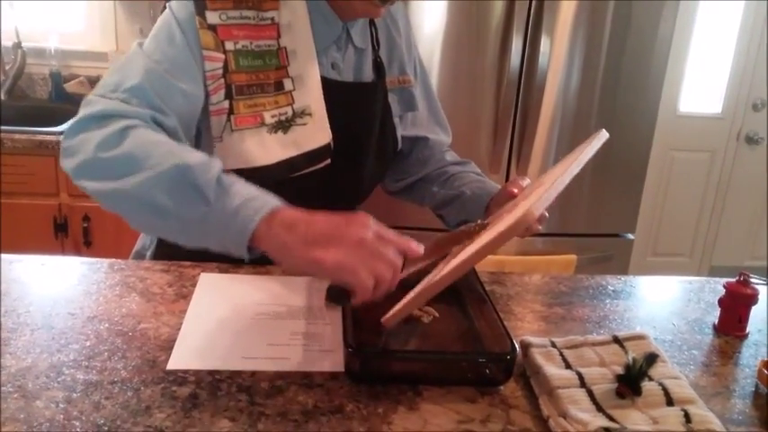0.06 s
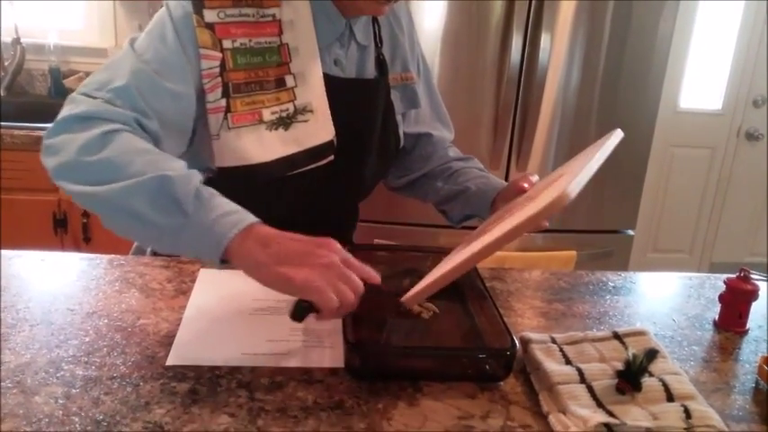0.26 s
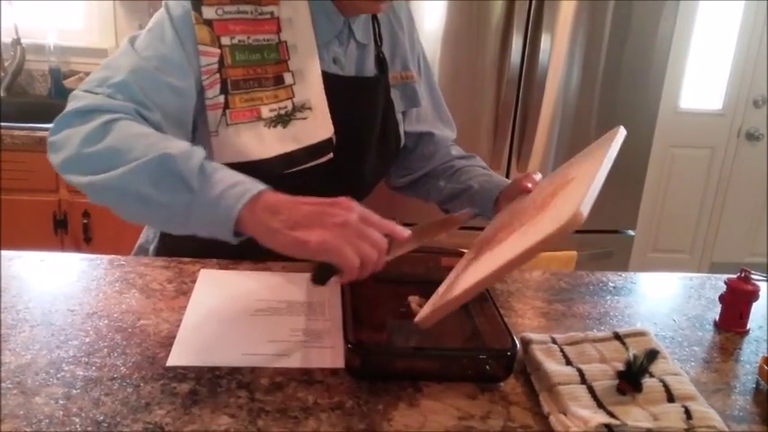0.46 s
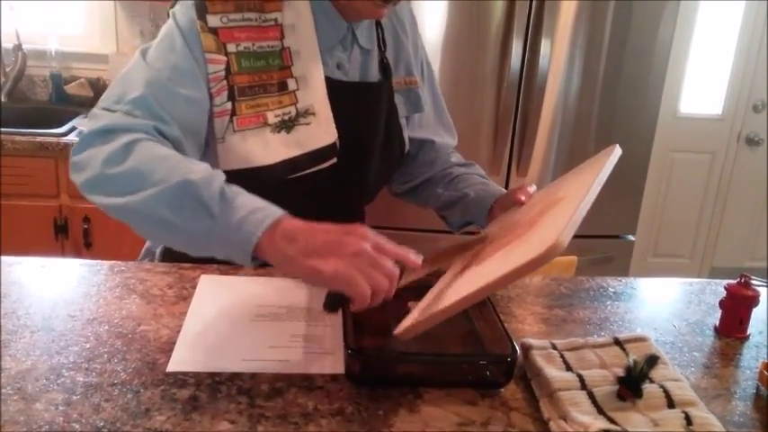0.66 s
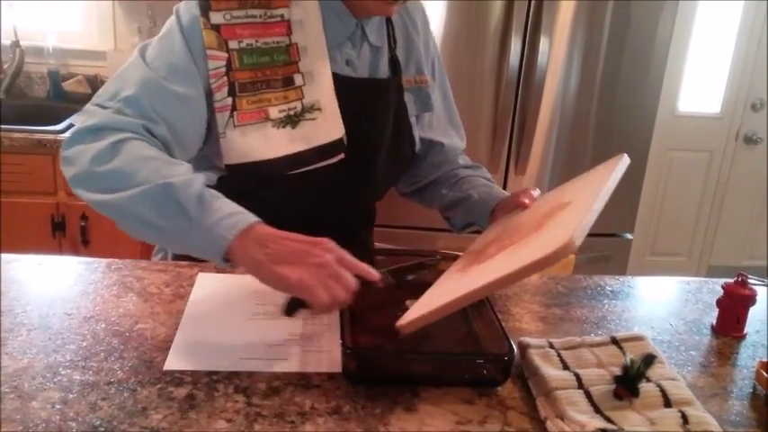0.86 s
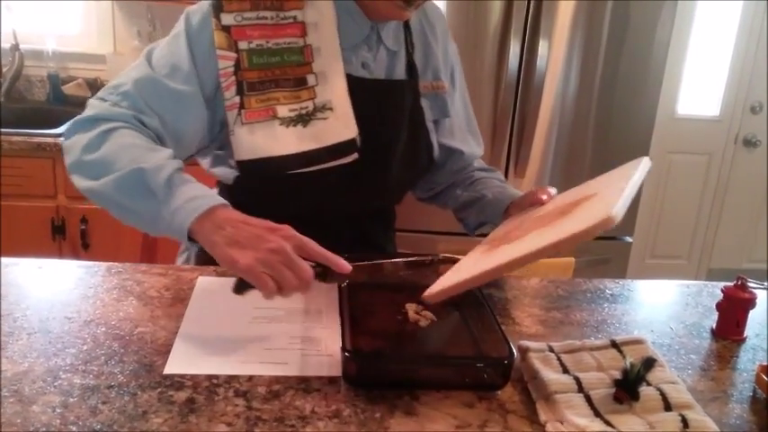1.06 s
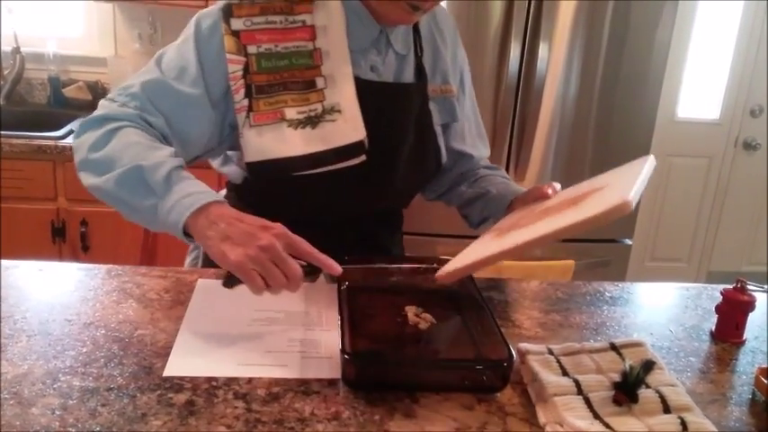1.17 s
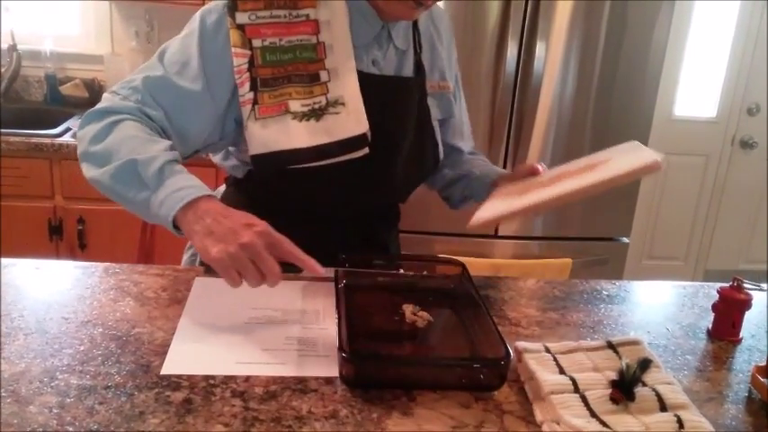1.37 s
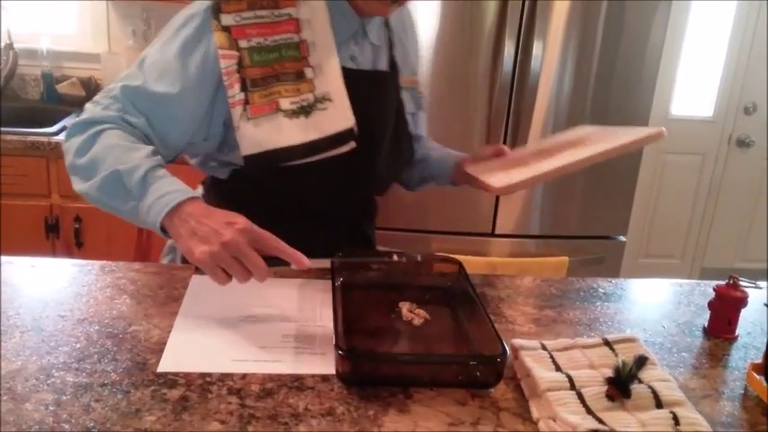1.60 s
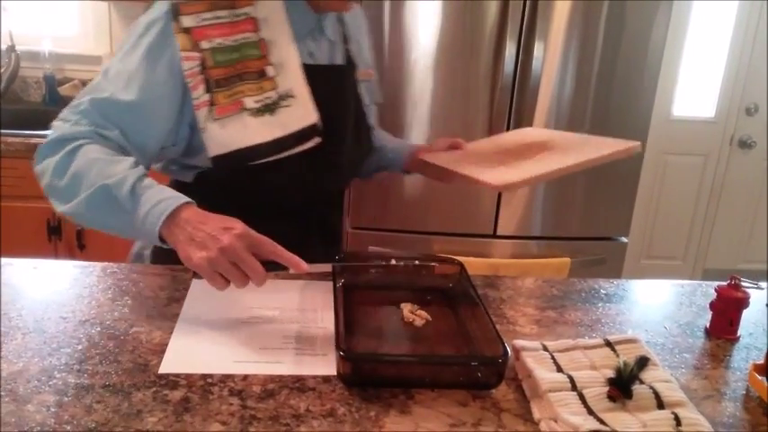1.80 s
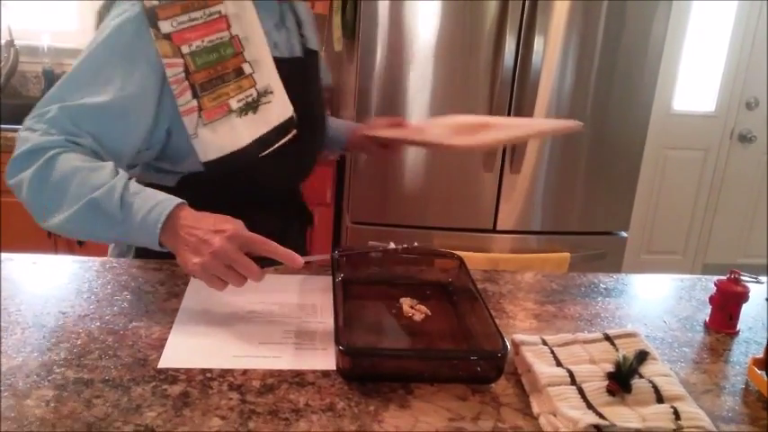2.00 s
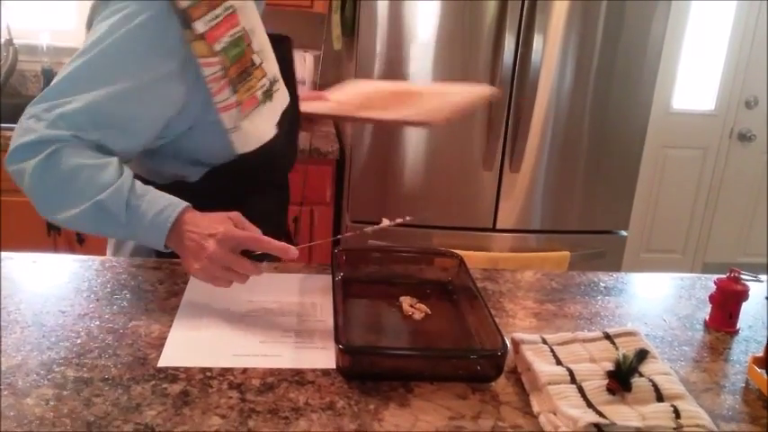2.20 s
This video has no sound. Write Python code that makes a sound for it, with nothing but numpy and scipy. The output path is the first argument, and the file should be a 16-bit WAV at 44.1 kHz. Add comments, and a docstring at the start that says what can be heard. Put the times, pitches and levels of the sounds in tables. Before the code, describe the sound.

A knife scrapes a wooden cutting board in a quiet kitchen. A sharp woody tap at 0.13 s leads to a strong, gritty scrape at 0.2-0.3 s with thin steely hiss. Another tap at 0.8 s runs straight into a shorter, softer scrape until 0.9 s. Reflections fade over soft appliance hum and faint stereo air; from about 2.1 s a sleeve swishes lightly. Close microphones.

```python
"""Knife scraping a wooden board

A kitchen knife is set on a tilted board and scraped down it twice, pushing food into a dish.
Irregular catches and a noisy rub drive resonances of board and blade; sharp taps set the knife down.
Filtered noise bursts make the kitchen's reflections; wavering tones make an appliance's soft hum.
Coloured stereo noise makes the quiet air and, at the end, a sleeve's swish as the board is swung away."""
import sys
import numpy as np
from scipy import signal
from scipy.fft import rfft, irfft
from scipy.io import wavfile

SR = 44100
rng = np.random.default_rng(int(sys.argv[2]) if len(sys.argv) > 2 else 0)


def put_to_file(sound):
    """Save the sound as 16-bit audio at rate SR, in the file named by the first command-line argument."""
    columns = np.atleast_2d(sound).T  # one column per channel
    safe = np.clip(columns, -1, 1)
    whole_steps = np.round(safe * 32767)
    wavfile.write(sys.argv[1], SR, whole_steps.astype(np.int16))


N = 99225
TIME = np.arange(N) / SR

# quiet kitchen's colour before overall scaling: (frequency [Hz], relative density [dB per Hz])
AIR_COLOUR = [(20, -11), (40, -27), (62, -8), (85, -5), (120, -10.5), (160, -12.5), (200, -7.5), (300, -15),
              (345, -18), (400, -13.5), (550, -16.5), (1000, -15), (1750, -18), (3200, -22.5), (4600, -22),
              (6000, -28), (10000, -29), (15500, -28)]
AIR_DB = -66
# left-right likeness of air and sleeve: (frequency [Hz], likeness [-1 to 1])
AIR_LIKENESS = [(30, 0.84), (120, 0.71), (400, 0.55), (1000, 0.16), (3000, 0.042), (15000, 0.017)]
# appliance tones: (frequency [Hz], level [dB])
HUM_TONES = [(118.6, -74), (302, -79.5)]
HUM_WAVER_DEPTH, HUM_WAVER_HZ = 0.25, 12  # depth is relative to the steady tone; rate is a spread

# blade set down on the board: (time [s], contact level [dB], room send against the tap [dB])
TAPS = [(0.135, -27.5, -2), (.808, -27.5, 2.5)]
CHATTER_DB, CHATTER_S = -15, .005  # chatter against the sharp contact, and its decay
# broad response of board and knife under a tap: (frequency [Hz], relative level [dB])
TAP_BODY = [(100, -14), (330, -13.5), (480, -13), (750, -4), (1130, -3.5), (1600, 0.5), (2400, 4),
            (3400, -4), (4700, -1), (5600, -1.5), (7000, -19), (9000, -15.5), (16000, -28)]
# resonances of board and knife together, lifted over the broad response:
# (frequency [Hz], width [Hz], first stroke lift [dB], second stroke lift [dB], tap lift [dB])
BOARD_MODES = [(388, 30, 14, 13, 22), (480, 26, -10, 13, 14), (575, 36, 9, 20, 19), (700, 45, 20, 21, 17),
               (884, 28, 28, 26, 9), (995, 36, 9, 19, 6), (1279, 26, 23, 5, 7), (1392, 42, 10, 18, 9),
               (1845, 50, 9, 6, 7), (1990, 63, 8, -6, -10), (2120, 55, 7, 13, 2), (2255, 72, -4, 11, 5),
               (2545, 27, 14, -4, 4), (2770, 79, 9, 9, -3), (2965, 78, 6, 9, 8), (3200, 70, 12, 5, -1),
               (3690, 57, 6, -4, 0), (3980, 260, 5, 4, 15), (4460, 85, 2, 9, 6), (4800, 112, 4, -10, 1)]

# two strokes, each a list of (time [s], force on the board [dB], hiss of the edge [dB])
STROKES = [
    [(.2, -58.5, -88.5), (.213, -57, -65), (.224, -41, -62), (.249, -33, -46.5), (.28, -34, -49),
     (.297, -31, -50.5), (.302, -30, -67), (.308, -34, -87)],
    [(.809, -57, -63), (.82, -45.5, -64), (.846, -45.5, -60), (.878, -39, -55), (.887, -40.5, -55.5),
     (.904, -34.5, -61), (.911, -81, -81)],
]
SLIPS_PER_S, SLIP_SPREAD_DB, RUB_SHARE = 1400, 4, .55  # rub is a share of the catches' rms
# broad response of board and knife under a scrape: (frequency [Hz], relative level [dB])
SCRAPE_BODY = [(100, -35), (330, -20), (480, -19), (750, -25.5), (1130, -10), (1600, -1), (2400, -2.5),
               (3400, -0.5), (4700, -0.5), (5600, -7), (7000, -12), (10000, -18.5), (16000, -38)]

# thin hiss of the steel edge: (frequency [Hz], relative level [dB])
EDGE_BODY = [(100, -58), (3000, -34), (6000, 15), (8000, -9), (9700, -0.5), (12500, 3.5), (16000, -2.5)]
# rings of the blade: (frequency [Hz], width [Hz], lift [dB])
BLADE_MODES = [(7210, 50, 7), (8980, 60, 10), (10300, 50, 6), (11900, 200, 6), (13650, 150, 4)]
EDGE_LIKENESS, EDGE_LEAN_DB = 0.22, 3.5  # left-right likeness; left minus right

# kitchen reverberation: (frequency [Hz], 60 dB decay time [s], level against the direct sound [dB])
ROOM = [(200, 0.36, -6), (720, 0.5, -1), (1460, .38, -2), (2600, .42, -2.5), (4670, 0.31, 1),
        (6900, 0.47, -7), (11500, 0.7, -10.5)]
ROOM_GAP_S, EARLY_DB, EARLY_S = 0.0072, -5.5, 0.0079
# two close microphones hear low reflections more alike: (frequency [Hz], likeness [-1 to 1])
ROOM_LIKENESS = [(100, 0.46), (500, 0.69), (1000, 0.22), (2000, 0.14), (4000, 0), (15000, 0.34)]
# the room hears the whole board, so its peaks are blunter
ROOM_WIDTH_FACTOR, ROOM_PEAK_DB = 1.4, -3
# stereo lean of the knife sounds: (frequency [Hz], left minus right [dB])
KNIFE_LEAN = [(300, 1), (850, 1.5), (1300, -1.7), (2500, -2.7), (4000, -1), (6000, 0), (9000, 1.5),
              (14000, 2.5)]
LEFT_LEADS_S = .00003

# sleeve's swell: (time [s], level [dB])
SLEEVE_LEVEL = [(1.95, -80), (2.09, -71), (2.18, -58.5), (2.25, -59.5)]
# sleeve's colour: (frequency [Hz], relative level [dB])
SLEEVE_BODY = [(100, -6), (300, -12), (1400, -6.5), (2200, -9.5), (3300, -2.5), (4300, 4.5), (4900, -0.5),
               (5900, -10.5), (9000, -20), (16000, -23)]
CUTOFF_HZ = 15850


def amp(db):
    """Turns decibels into gain."""
    return 10 ** (np.asarray(db) / 20)


def unit(x):
    """Scales a sound to rms 1."""
    return x / np.sqrt(np.mean(x ** 2) + 1e-20)


def read(points, hz, column=1):
    """Reads a table column along log frequency."""
    rows = np.array(points, float)
    return np.interp(np.log(hz + 1), np.log(rows[:, 0] + 1), rows[:, column])


def level(points, column=1):
    """Turns a dB curve into gain over time, silent outside the curve."""
    rows = np.array(points, float)
    db = np.interp(TIME, rows[:, 0], rows[:, column], left=-np.inf, right=-np.inf)
    return amp(db)


def noise():
    """Draws white noise for the whole scene."""
    return rng.standard_normal(N)


def ring(body, modes, size=16384):
    """Minimum-phase impulse response of energy 1: a broad response lifted at each mode."""
    hz = np.fft.rfftfreq(size, 1 / SR)
    lift = 1 + sum(amp(db) ** 2 / (1 + ((hz - f) / width) ** 2) ** 2 for f, width, db in modes)
    magnitude = amp(read(body, hz)) * np.sqrt(lift)
    # folding the cepstrum forward makes the response causal
    cepstrum = irfft(np.log(magnitude))
    cepstrum[1:size // 2] *= 2
    cepstrum[size // 2 + 1:] = 0
    response = irfft(np.exp(rfft(cepstrum)))[:size // 2]
    return response / np.linalg.norm(response)


def through(x, response):
    """Passes a sound through an impulse response."""
    return signal.fftconvolve(x, response)[:N]


def diffuse(body, likeness):
    """Stereo noise of rms 1 with a given colour and left-right likeness."""
    hz = np.fft.rfftfreq(N, 1 / SR)
    left, other = rfft(noise()), rfft(noise())
    same = np.clip(read(likeness, hz), -1, 1)
    right = same * left + np.sqrt(1 - same ** 2) * other
    return unit(irfft(np.array([left, right]) * amp(read(body, hz)), N))


def air():
    """The quiet kitchen's steady stereo noise floor."""
    return amp(AIR_DB) * diffuse(AIR_COLOUR, AIR_LIKENESS)


def hum():
    """Low appliance tones whose strength and phase waver as random slow and fast drifts add up."""
    out = np.zeros(N)
    for hz, db in HUM_TONES:
        drift = np.zeros(N, complex)
        for _ in range(10):
            cycles = HUM_WAVER_HZ * rng.normal() * TIME + rng.random()
            drift += np.exp(2j * np.pi * cycles) / np.sqrt(10)
        tone = (1 + HUM_WAVER_DEPTH * drift) * np.exp(2j * np.pi * hz * TIME)
        out += amp(db) * unit(tone.real)
    return out


def tap(start, db):
    """One sharp contact with a few milliseconds of chatter rings the board and knife."""
    fade = (TIME > start) * np.exp(-((TIME - start) / CHATTER_S) ** 2)
    force = amp(CHATTER_DB) * noise() * fade
    force[round(start * SR)] += 1
    modes = [(f, width, lifts[-1]) for f, width, *lifts in BOARD_MODES]
    return amp(db) * through(force, ring(TAP_BODY, modes))


def friction():
    """Irregular catches of the edge on the grain, over a smooth rub."""
    strength = amp(SLIP_SPREAD_DB * np.clip(noise(), -2, 2))
    slips = (rng.random(N) < SLIPS_PER_S / SR) * strength
    return unit(unit(slips - slips.mean()) + RUB_SHARE * noise())


def scrapes():
    """Strokes meet the board at different places, favouring other modes; returns direct and room feed."""
    direct = sent = np.zeros(N)
    for k, stroke in enumerate(STROKES):
        force = friction() * level(stroke)
        modes = [(f, width, lifts[k]) for f, width, *lifts in BOARD_MODES]
        blunt = [(f, width * ROOM_WIDTH_FACTOR, db + ROOM_PEAK_DB) for f, width, db in modes]
        direct = direct + through(force, ring(SCRAPE_BODY, modes))
        sent = sent + through(force, ring(SCRAPE_BODY, blunt))
    return direct, sent


def edge():
    """The steel edge hisses and faintly rings the blade, differently toward each microphone."""
    force = sum(level(stroke, column=2) for stroke in STROKES)
    blade = ring(EDGE_BODY, BLADE_MODES)
    left = through(friction() * force, blade)
    other = through(friction() * force, blade)
    same, lean = np.clip(EDGE_LIKENESS, 0, 1), amp(EDGE_LEAN_DB / 2)
    right = same * left + np.sqrt(1 - same ** 2) * other
    return left * lean, right / lean


def kitchen(size=32768):
    """One set of reflections: quick sparse ones off counter and dish, and the room's decaying tail."""
    t = np.arange(size) / SR
    hz, at, bands = signal.stft(rng.standard_normal(size), SR, nperseg=256)
    t60 = np.maximum(read(ROOM, hz), .05)[:, None]
    # each band decays at its own rate, scaled so its energy follows the table's level
    decay = np.exp(-np.log(1000) * at / t60)
    energy_scale = np.sqrt(2 * np.log(1000) / t60 / SR)
    bands = bands * amp(read(ROOM, hz, column=2))[:, None] * decay * energy_scale
    fade_in = np.clip(t / ROOM_GAP_S - .5, 0, 1)
    tail = signal.istft(bands, SR, nperseg=256)[1][:size] * fade_in
    sparse = rng.standard_normal(size) * (rng.random(size) < .05)
    early = sparse * t * np.exp(-2 * t / EARLY_S)
    return tail + amp(EARLY_DB) * early / np.linalg.norm(early)


def knife():
    """Taps, scrapes and hiss at the two microphones, with the kitchen's reflections."""
    direct, sent = scrapes()
    for start, db, room_db in TAPS:
        hit = tap(start, db)
        direct, sent = direct + hit, sent + amp(room_db) * hit
    hz = np.fft.rfftfreq(N, 1 / SR)
    same = np.clip(read(ROOM_LIKENESS, hz), -1, 1)
    # a shared part and an opposed part set how alike the two sides are
    shared = rfft(kitchen(), N) * np.sqrt((1 + same) / 2)
    apart = rfft(kitchen(), N) * np.sqrt((1 - same) / 2)
    left_hiss, right_hiss = edge()
    left = rfft(direct + left_hiss) + rfft(sent + left_hiss) * (shared + apart)
    right = rfft(direct + right_hiss) + rfft(sent + right_hiss) * (shared - apart)
    lean = amp(read(KNIFE_LEAN, hz) / 2)
    advance = np.exp(2j * np.pi * hz * LEFT_LEADS_S)
    return irfft([left * lean * advance, right / lean], N)


def sleeve():
    """Cloth slides on cloth as the arm swings round: coloured stereo noise under a swell."""
    return level(SLEEVE_LEVEL) * diffuse(SLEEVE_BODY, AIR_LIKENESS)


def scene():
    """Knife and sleeve over the quiet, humming kitchen."""
    return air() + hum() + knife() + sleeve()


def record(dry):
    """The recorder's band limit: a steep low-pass filter."""
    lowpass = signal.firwin(701, CUTOFF_HZ, window=("kaiser", 9), fs=SR)
    return signal.oaconvolve(dry, lowpass[None], "same")


dry = scene()
out = record(dry)
put_to_file(out)
```